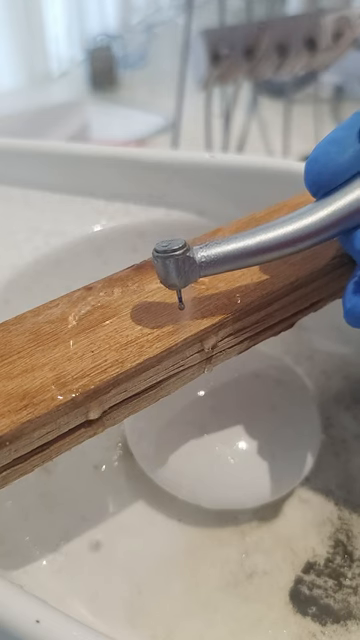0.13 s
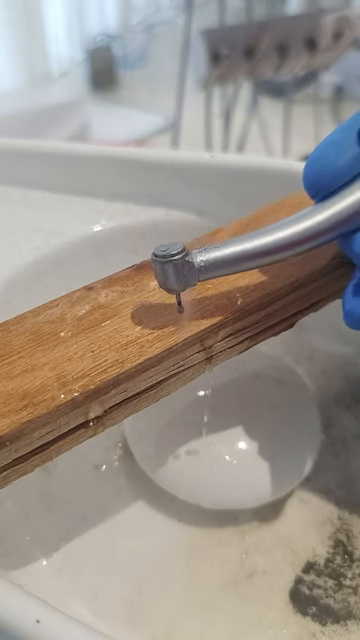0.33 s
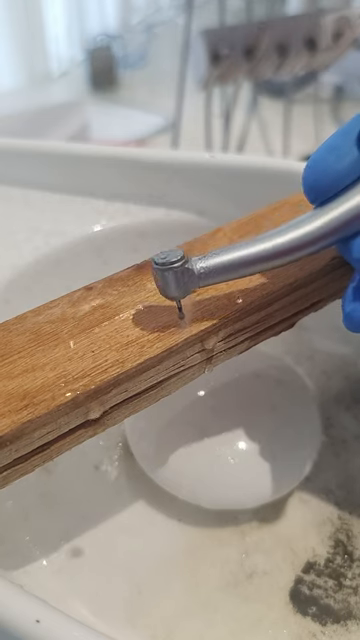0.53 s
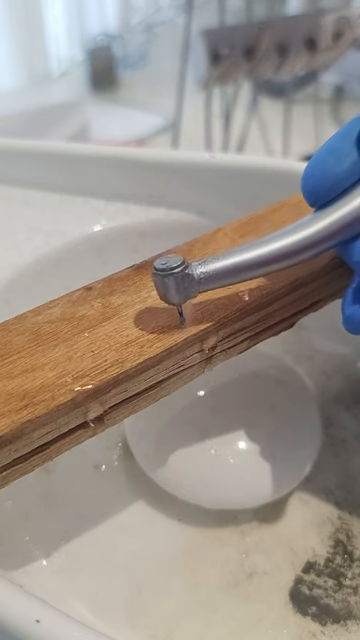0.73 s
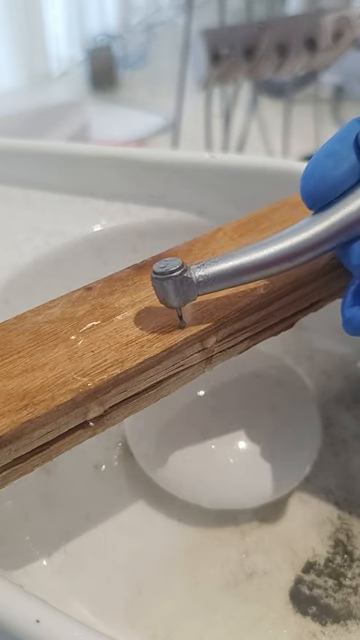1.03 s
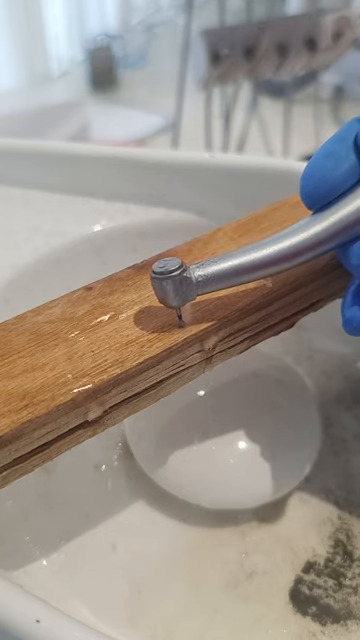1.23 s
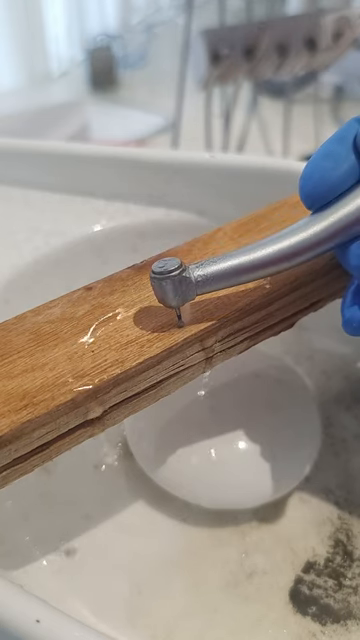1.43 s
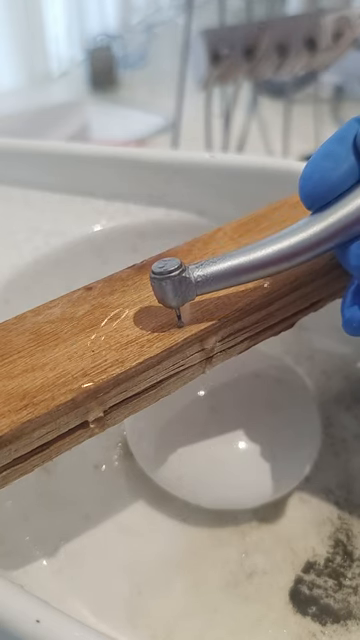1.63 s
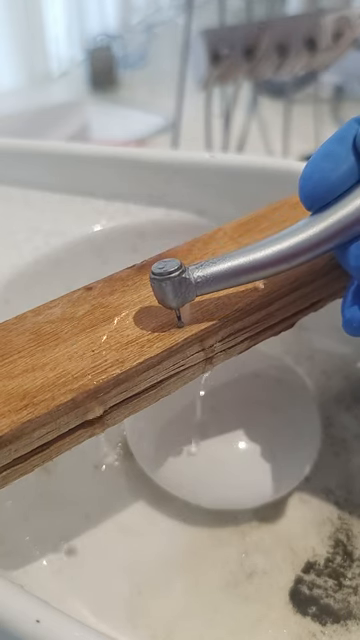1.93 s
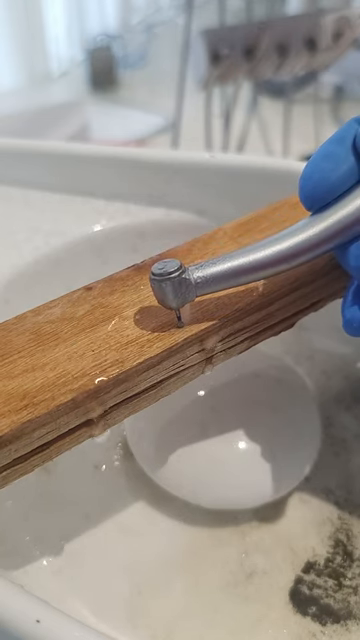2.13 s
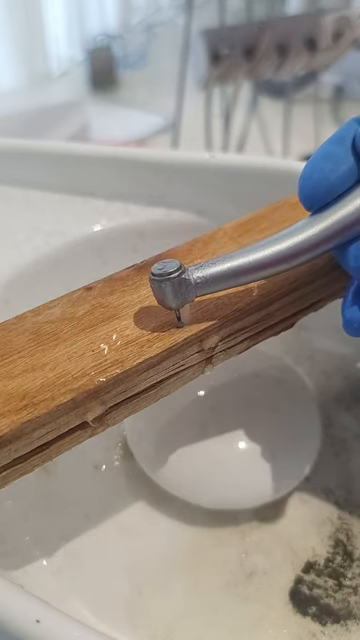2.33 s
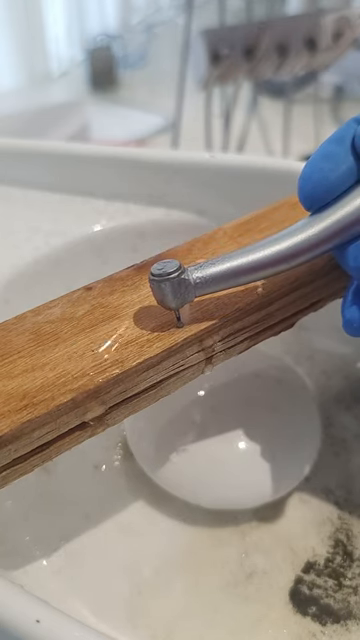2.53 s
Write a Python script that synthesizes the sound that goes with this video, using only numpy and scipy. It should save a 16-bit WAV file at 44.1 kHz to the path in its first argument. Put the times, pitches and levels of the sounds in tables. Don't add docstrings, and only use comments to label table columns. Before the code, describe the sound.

A dental drill whines piercingly and steadily amid bright air and water hiss, then drops in pitch under load as the bur enters wood, with rough chatter and tiny squeals; close phone microphone, faint room hum.

```python
import sys
import numpy as np
from scipy import signal
from scipy.fft import rfft, irfft, next_fast_len
from scipy.io import wavfile
from scipy.ndimage import uniform_filter1d, map_coordinates

SR = 44100
rng = np.random.default_rng(int(sys.argv[2]) if len(sys.argv) > 2 else 0)


def field_ratio(decibels):
    return 10 ** (np.asarray(decibels, dtype=float) / 20)


def generate_wav(sig):
    pcm = np.round(np.clip(np.atleast_2d(sig).T, -1, 1) * 32767).astype(np.int16)
    wavfile.write(sys.argv[1], SR, pcm)


N = 118629
TIME = np.arange(N) / SR

PORT_LAG = np.array([[0], [1.6]])


def along(points, hz):
    f, v = np.transpose(points)
    return np.interp(np.log(hz + 1), np.log(f + 1), v)


def curves(rows):
    s, *cols = np.transpose(rows)
    return np.array([np.interp(TIME, s, c) for c in cols])


def wobble(rate):
    knots = rng.standard_normal(int(N * rate / SR) + 4)
    return map_coordinates(knots, [np.arange(N) * rate / SR])


def filtered(x, response):
    m = next_fast_len(N + 8192)
    return irfft(rfft(x, m) * response(np.fft.rfftfreq(m, 1 / SR)), m)[..., :N]


def tone(hz, lag=0):
    return np.sqrt(2) * np.sin(2 * np.pi * np.cumsum(hz) / SR - lag)


def patchy(patchy_db):
    z = signal.stft(rng.standard_normal((2, N + 512)), nperseg=512)[2]
    field = rng.standard_normal(z.shape[1:])
    field = uniform_filter1d(field, size=5, axis=0)
    field = uniform_filter1d(field, size=12, axis=1)
    pair = signal.istft(z * field_ratio(patchy_db * field / field.std()), nperseg=512)[1][:, :N]
    return pair / pair.std() * np.sqrt(SR / 2)


def turbine():
    # (time [s], shaft speed [Hz], near whine [dB], far whine [dB], near port leads [rad],
    # near second order [dB])
    shaft = [(.06, 7536, -26, -48, -2.7, -60), (.62, 7532, -30.5, -47, -2.5, -60),
             (1.04, 7521, -25, -42, -2.9, -55), (1.16, 7458, -39, -39, -1.4, -55),
             (1.33, 7268, -26, -51, -3.9, -50), (1.41, 7127, -25, -36, -4.4, -28),
             (1.48, 6950, -36, -31, -6.3, -55), (1.55, 6750, -27, -41, -7.9, -44),
             (1.7, 6420, -27, -30, -11.2, -29), (1.84, 6128, -48, -30, -14.6, -38),
             (1.9, 5984, -42, -28, -13.2, -27), (1.96, 5815, -32, -34, -12.8, -31),
             (2.0, 5715, -44, -35, -13.1, -39), (2.04, 5590, -52, -27, -14.4, -38),
             (2.08, 5465, -38, -28, -14.6, -33), (2.16, 5170, -53, -44, -13, -35),
             (2.24, 4968, -52, -35, -11, -48), (2.275, 4905, -32, -29, -9.6, -55),
             (2.36, 4780, -30, -30, -9.2, -42), (2.43, 4742, -28.5, -30.5, -9.15, -32),
             (2.5, 4672, -29, -29.5, -8.7, -33), (2.56, 4618, -28.5, -28, -8.8, -33),
             (2.62, 4565, -28, -32, -8.6, -33), (2.68, 4495, -26, -28, -8.1, -33)]
    # (frequency [Hz], level [dB])
    second_far = [(9000, -65), (13000, -63), (13500, -30), (14200, -44), (14800, -46), (15100, -54)]
    # (time [s], front near [dB], front far [dB], rear near [dB], rear far [dB])
    cages = [(.05, -42, -62, -70, -70), (.93, -44, -56, -70, -60), (1.06, -54, -44, -66, -60),
             (1.15, -54, -54, -56, -45), (1.27, -52, -52, -52, -41), (1.44, -51, -43, -56, -45),
             (1.55, -62, -62, -64, -49), (1.76, -64, -64, -47, -43), (1.88, -64, -64, -44, -42),
             (2.04, -64, -64, -48, -43), (2.1, -64, -64, -62, -55), (2.2, -64, -64, -60, -51),
             (2.5, -64, -64, -52, -53), (2.68, -64, -64, -57, -60)]
    # (time [s], near port leads [rad])
    rear_lead = [(1.3, -2), (1.68, -.6), (1.76, .9), (2.0, 1.9), (2.15, 0), (2.68, .5)]
    # (time [s], near level [dB])
    chatter_level = [(1.7, -60), (1.78, -37), (1.84, -46), (1.98, -36), (2.02, -46), (2.06, -32),
                     (2.12, -33), (2.14, -44), (2.2, -35), (2.25, -37), (2.29, -60)]

    speed_hz, near_db, far_db, lead, second_db = curves(shaft)
    speed_hz = uniform_filter1d(speed_hz, size=2000) + 3 * wobble(40)
    flutter = field_ratio(1 * wobble(30.08))
    whine = field_ratio([near_db, far_db]) * flutter * tone(speed_hz, lead * [[0], [1]])
    second = field_ratio([second_db, along(second_far, 2 * speed_hz)]) * field_ratio(1 + 3 * wobble(28)) * tone(2 * speed_hz)

    cage_db = curves(cages)
    front_ratio = .4015
    front = field_ratio(cage_db[:2] + 1.5 * wobble(23.8)) * tone(front_ratio * speed_hz)
    touch_s, catch_s, slip = 1.0, .2, .035
    rear_ratio = .3945 - slip * np.exp(-np.clip(TIME - touch_s, 0, None) / catch_s)
    rear_hz = rear_ratio * speed_hz + 11 * wobble(70)
    rear = field_ratio(cage_db[2:] - 1.5 + 3 * wobble(60)) * tone(rear_hz, curves(rear_lead) * [[0], [1]])

    spread_hz = 650
    chatter = field_ratio(curves(chatter_level) + [[0], [-20]]) * wobble(spread_hz) * tone(speed_hz)
    return field_ratio(3) * (whine + second + front + rear) + chatter


def rubbing_tones(rows, far_db, waver_hz):
    out = 0
    for s, length, first_hz, last_hz, db in rows:
        u = np.clip((TIME - s) / length, 0, 1)
        hz = first_hz + (last_hz - first_hz) * u + waver_hz * wobble(45)
        swell = np.abs(np.sin(np.pi * u)) ** .25 * (u < 1)
        out = out + field_ratio(db + 1.5 * wobble(50)) * swell * tone(hz, PORT_LAG)
    return out * field_ratio([[0], [far_db]])


def bur_squeals():
    # (start [s], length [s], first pitch [Hz], last pitch [Hz], near level [dB])
    rubs = [
        (2.03, .075, 12770, 12700, -31),
        (2.112, .075, 12650, 12590, -29),
        (2.203, .07, 12690, 12580, -27),
        (2.262, .092, 12600, 12690, -28),
        (2.38, .03, 12690, 12770, -31),
    ]
    return rubbing_tones(rubs, far_db=-22, waver_hz=18)


def bur_chirps():
    # (start [s], length [s], first pitch [Hz], last pitch [Hz], near level [dB])
    rubs = [
        (2.095, .035, 3060, 3140, -35),
        (2.153, .022, 3090, 3060, -36),
        (2.17, .06, 3110, 3230, -40),
        (2.22, .075, 3240, 3220, -39),
    ]
    return rubbing_tones(rubs, far_db=1, waver_hz=20)


def rear_retainer():
    # (start [s], length [s], first pitch [Hz], last pitch [Hz], near level [dB])
    songs = [
        (.04, .97, 2668, 2655, -62),
        (1.0, .12, 2655, 2720, -59),
        (1.11, .3, 2715, 2705, -62),
    ]
    return rubbing_tones(songs, far_db=15, waver_hz=7.7)


def basin(hz):
    # (centre [Hz], width [Hz], gain [dB])
    near_modes = [(1230, 95, 6), (2280, 120, -1), (2650, 71, -8), (3375, 34, -5.5), (4090, 98, -9.5),
                  (8080, 245, 6.5), (9000, 75, -2), (9490, 130, 2.5), (10150, 120, 2.5), (11050, 100, 1.5),
                  (11910, 345, 6), (12800, 90, 1.5)]
    far_modes = [(1350, 39, -3), (2430, 100, 0.5), (2570, 46, -5.5), (3326, 92, -11.5), (4046, 94, -8.5),
                 (4860, 170, -3.5), (5550, 120, 1.5), (5570, 54, 0)]
    return field_ratio([sum(db * np.exp(-.5 * ((hz - c) / w) ** 2) for c, w, db in modes)
                for modes in (near_modes, far_modes)])


def jet():
    # (frequency [Hz], level [dB per Hz])
    jet_near = [(6500, -82.5), (6850, -67.5), (7250, -57.5), (8600, -54.5), (10600, -58), (13000, -58.5),
                (14000, -58.5), (15700, -64)]
    jet_far = [(8200, -82), (8350, -78), (9000, -74), (10900, -69), (11800, -75), (13000, -73),
               (13150, -66), (14400, -63)]

    def colour(hz):
        return field_ratio([along(jet_near, hz), along(jet_far, hz) - 40 * (hz < 6800)]) * basin(hz)

    early_db, settle_s = 1.5, 0.64
    settle_db = early_db * (np.exp(-TIME / settle_s) - .25)
    return field_ratio(settle_db + .3 * wobble(3) + .4 * wobble(15)) * filtered(patchy(patchy_db=1.1), colour)


def spray():
    # (frequency [Hz], level [dB per Hz])
    spray_near = [(40, -79), (200, -77.5), (520, -90.5), (1000, -82.5), (2000, -77), (3000, -69.5),
                  (6000, -68.5), (6800, -67)]
    spray_far = [(40, -73), (200, -76.5), (620, -84.5), (1000, -78.5), (1900, -76.5), (2800, -64.5),
                 (4600, -64.5), (6400, -66.5)]
    # (frequency [Hz], likeness [0 to 1])
    alike = [(150, 0.61), (500, 0.51), (950, 0.63), (1200, 0.83), (2500, 0.45), (3800, 0.56), (4300, 0.16),
             (5400, 0.069)]
    # (frequency [Hz], near port leads [rad])
    port_lead = [(1000, 0.42), (1600, 1.3), (1900, 1.9), (2250, 2.36), (2600, 0.93), (2800, 4.5),
                 (3300, 2.8), (4700, 4.15)]

    def like(hz):
        return np.clip(along(alike, hz), 0, 1)

    near, other = patchy(patchy_db=0.93)
    shared = filtered(near, lambda hz: like(hz) * np.exp(-1j * along(port_lead, hz)))
    own = filtered(other, lambda hz: np.sqrt(1 - like(hz) ** 2))
    mist = np.array([near, shared + own])

    def shaped(far_edge_hz):
        near_edge_hz = 7100

        def response(hz):
            density = field_ratio([along(spray_near, hz), along(spray_far, hz)])
            return density * basin(hz) / (1 + (hz / [[near_edge_hz], [far_edge_hz]]) ** 120)

        return filtered(mist, response)

    narrowed = np.clip((TIME - 1.56) / .04, 0, 1)
    early_db, settle_s = 4, 0.49
    level_db = early_db * np.exp(-TIME / settle_s) + .5 * wobble(3.23) + .5 * wobble(11.55)
    return field_ratio(level_db) * ((1 - narrowed) * shaped(7620) + narrowed * shaped(6950))


def compressor():
    # (crank order [multiple], level [dB])
    orders = [(2, -54), (4, -36.5), (5, -58), (6, -60), (8, -51.5), (9, -62), (12, -66.5), (13, -64.5),
              (14, -68), (16, -82.5), (19, -84), (20, -70.5)]
    crank_hz, waver_db, pan_db = 22.28, .7, -1
    hum = 0
    for order, db in orders:
        phase = 2 * np.pi * (order * crank_hz * TIME + rng.random())
        hum = hum + field_ratio(db + waver_db * wobble(5.23)) * np.sqrt(2) * np.sin(phase)
    return hum * field_ratio([[pan_db], [-pan_db]])


def knock():
    t = TIME - 2.619
    length_s, pitch_hz = .0045, 175
    swing = field_ratio(-24.5) * np.exp(-.5 * (t / length_s) ** 2) * np.sin(2 * np.pi * pitch_hz * t)
    return swing * field_ratio([[0], [-16]])


def band_silences(x):
    # (centre time [s], length [s], low edge [Hz], high edge [Hz])
    silences = [(.313, .035, 3880, 4200), (.43, .03, 3900, 4200), (.522, .035, 3850, 4150),
                (.615, .035, 3150, 3750), (.655, .06, 3250, 3420), (.88, .05, 3850, 4030),
                (.987, .03, 3850, 4070), (1.057, .03, 3170, 3520), (1.545, .035, 3380, 3720),
                (2.26, .05, 3330, 3460), (2.59, .04, 4030, 4260)]
    under_db, from_hz, to_hz = -6.2, 1700, 4250
    turn = np.array([[1, 0.98], [1, -0.99]]) / np.sqrt(2)
    hz, t, z = signal.stft(turn @ x, SR, nperseg=1024)

    cells = np.abs(z[:, :512].reshape(2, 128, 4, -1)) ** 2
    power = uniform_filter1d(cells, size=3, axis=3).mean(axis=2)
    log_power = np.log(np.abs(power) + 1e-20)
    around = np.exp(uniform_filter1d(uniform_filter1d(log_power, size=9, axis=1), size=9, axis=2))
    quiet = np.repeat(power < around * field_ratio(2 * under_db), 4, axis=1)
    gated = ((hz > from_hz) & (hz < to_hz))[:512, None]
    z[:, :512] *= 1 - quiet * gated

    for s, length, low_hz, high_hz in silences:
        z[0] *= 1 - np.outer((hz > low_hz) & (hz < high_hz), np.abs(t - s) < .7 * length)
    return turn @ signal.istft(z, SR, nperseg=1024)[1][:, :N]


def scene():
    drill = turbine() + bur_squeals() + bur_chirps() + rear_retainer()
    return drill + jet() + spray() + compressor() + knock()


def roll_off(x):
    return signal.sosfilt(signal.butter(12, 17090, fs=SR, output="sos"), x)


def record(dry):
    open_s, fade_s, top_hz = .035, 0.011, 15750
    fade = np.sin(np.pi / 2 * np.clip((TIME - open_s) / fade_s, 0, 1)) ** 2
    mix = filtered(band_silences(dry), lambda hz: hz < top_hz) * fade
    return roll_off(mix)


dry = scene()
out = record(dry)
generate_wav(out)
```